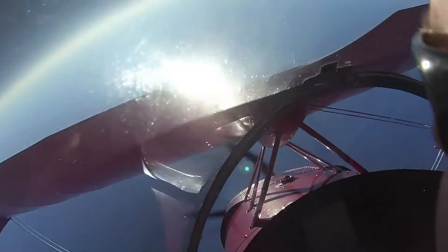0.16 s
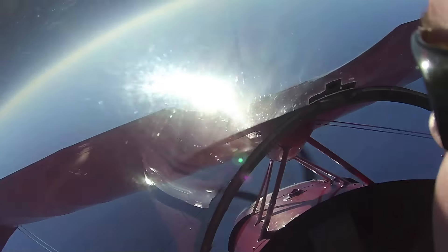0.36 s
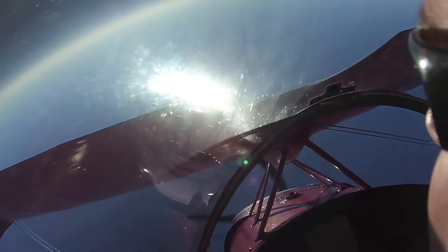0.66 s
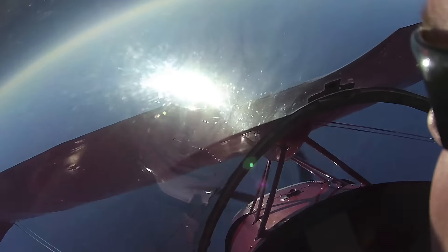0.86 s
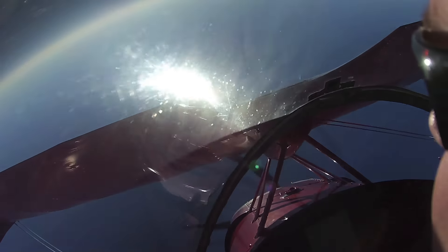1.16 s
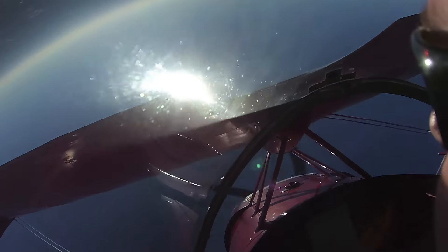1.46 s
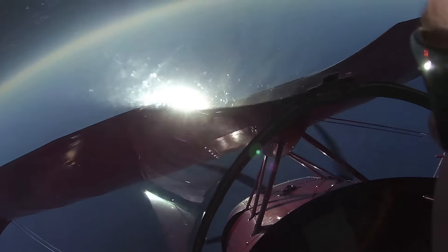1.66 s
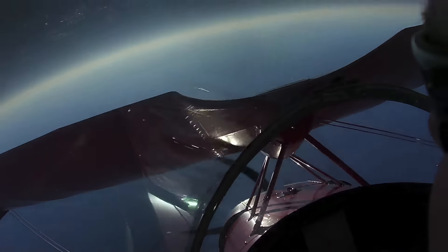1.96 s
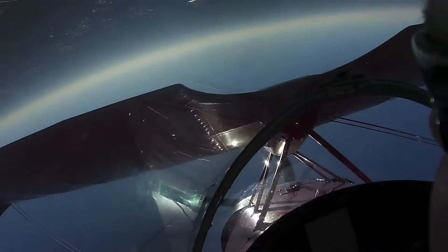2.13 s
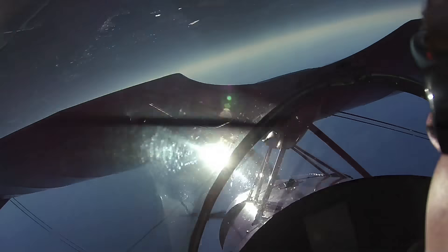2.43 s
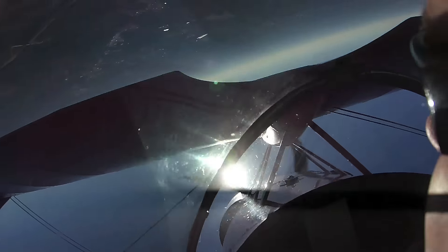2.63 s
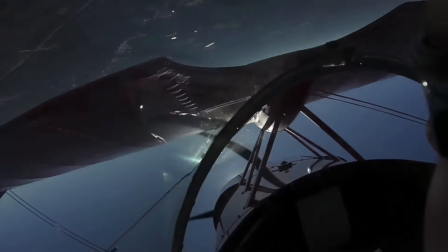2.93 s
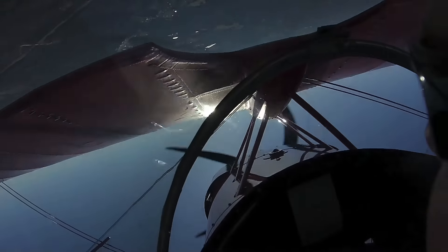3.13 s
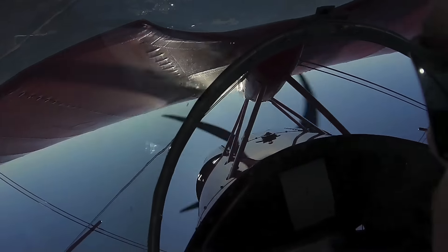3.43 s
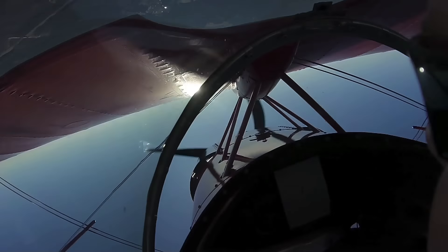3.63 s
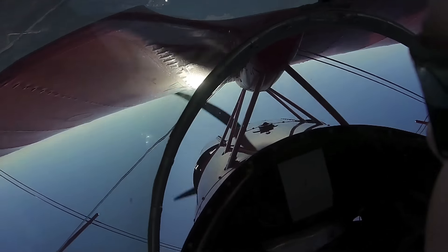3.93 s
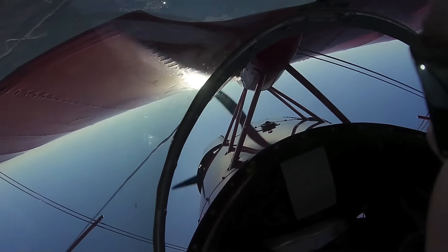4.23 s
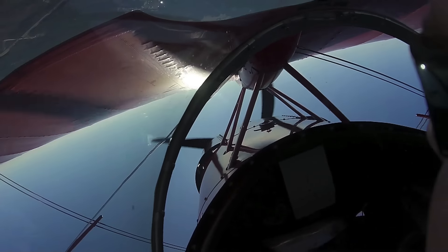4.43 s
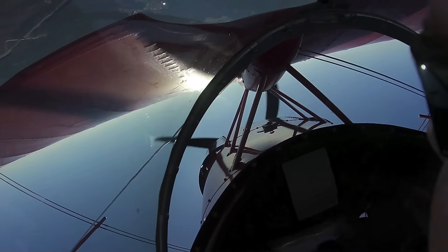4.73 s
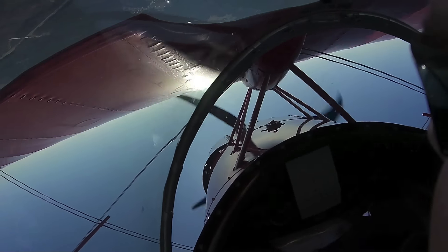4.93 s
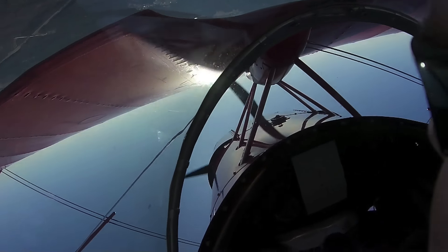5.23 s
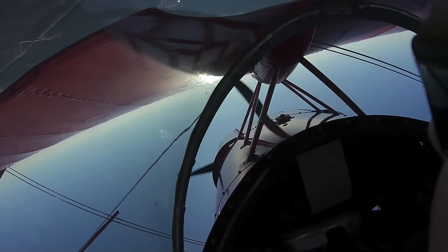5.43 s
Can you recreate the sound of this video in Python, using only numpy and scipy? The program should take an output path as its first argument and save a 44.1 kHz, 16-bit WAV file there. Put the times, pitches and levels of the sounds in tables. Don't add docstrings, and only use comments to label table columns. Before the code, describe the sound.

Inside an open biplane cockpit, a hard propeller drone and roaring wind crackle at full power, then sag to a low idle throb.

```python
import sys
import numpy as np
from scipy import signal
from scipy.fft import rfft, irfft, next_fast_len
from scipy.io import wavfile
from scipy.ndimage import uniform_filter1d, map_coordinates

SR = 44100
rng = np.random.default_rng(int(sys.argv[2]) if len(sys.argv) > 2 else 0)


def materialize(psi):
    bounded = np.clip(np.atleast_2d(psi).T, -1, 1)
    quanta = np.round(bounded * 32767).astype(np.int16)
    wavfile.write(sys.argv[1], SR, quanta)


def undo_db(level):
    steps = np.asarray(level, float) / 20
    return 10 ** steps


N = 246078
TIME_S = np.arange(N) / SR
FULL_RUSH_DB = -15.5


def unit(x):
    return x / np.sqrt(np.mean(x ** 2) + 1e-20)


def curves(rows):
    s, *columns = np.transpose(rows)
    return [np.interp(TIME_S, s, column) for column in columns]


def wobble(rate):
    knots = rng.standard_normal(int(N * rate / SR) + 4)
    return map_coordinates(knots, [np.arange(N) * rate / SR])


def dips(rows):
    return sum(db * np.exp(-((TIME_S - s) / length) ** 2) for s, length, db in rows)


def coloured(x, spectrum):
    m = next_fast_len(N + 8192)
    hz, db = np.transpose(spectrum)
    bins_hz = np.fft.rfftfreq(m, 1 / SR)
    gain_db = np.interp(np.log(bins_hz + 1), np.log(hz + 1), db)
    return irfft(rfft(x, m) * undo_db(gain_db), m)[:N]


def turbulent_noise(spectrum, patchy_db):
    z = signal.stft(rng.standard_normal(N), nperseg=512)[2]
    field = uniform_filter1d(rng.standard_normal(z.shape), size=6, axis=0)
    field = uniform_filter1d(field, size=10, axis=1)
    noise = signal.istft(z * undo_db(patchy_db * unit(field)), nperseg=512)[1][:N]
    return unit(coloured(noise, spectrum))


# t/s, f/Hz (turns per second)
SHAFT_SPEED = [(0, 37.25), (.4, 37.39), (.6, 37.4), (1, 37.19), (1.2, 37.24), (1.6, 37.17), (1.8, 37.02),
               (2, 36.74), (2.2, 36.1), (2.4, 35.15), (2.8, 33.29), (3, 32.59), (3.4, 28.85), (3.8, 24.55),
               (4.4, 18.01), (4.6, 16.52), (5.2, 18.1), (5.57, 18.3)]


def shaft_speed():
    return curves(SHAFT_SPEED)[0]


def shaft_angle():
    return 2 * np.pi * np.cumsum(shaft_speed()) / SR + .75


def order(multiple, db, drift):
    return np.sqrt(2) * undo_db(db) * np.cos(multiple * shaft_angle() - 3.7 + drift)


# f/Hz, level/dB
COCKPIT_GAIN = [(33, -17), (45, -16), (65, 7), (85, 1.5), (110, 2), (140, 10.5), (190, 3.5), (300, 8.5)]


def cockpit_db(multiple):
    hz, db = np.transpose(COCKPIT_GAIN)
    return np.interp(np.log(multiple * shaft_speed()), np.log(hz), db)


# t/s, throttle level/dB, blade load level/dB
CONTROL_MOVES = [(0, 1.5, -3.5), (.5, 0, 0.5), (1.65, 1, -2), (1.9, -3.5, 4.5), (2.5, -5, 3.5),
                 (3.15, -17, 0.5), (3.4, -10, 5.5), (3.9, -21, 7.5), (4.22, -22, 4), (4.8, -18, -3),
                 (5.58, -34, 0)]
# t/s, length/s, level/dB
TONE_LULLS = [
    (3.0, 0.06, -7),
    (4.5, 0.19, -9.5),
]
# t/s, length/s, level/dB
BLADE_OVERTONE_FADES = [(.65, 0.071, -6), (2.3, 0.073, -8.5), (3.2, 0.25, -9), (4.0, 0.053, -5)]


def propeller():
    load_db = curves(CONTROL_MOVES)[1]
    overtone_db = 0.58 * load_db + dips(TONE_LULLS)
    blade_db = -28.5 + load_db + cockpit_db(multiple=2)
    second_db = -31.5 + overtone_db + dips(BLADE_OVERTONE_FADES) + cockpit_db(multiple=4)
    fourth_db = -43 + overtone_db + cockpit_db(multiple=8)
    sound = order(2, blade_db + .3 * wobble(0.67), .06 * wobble(3.1))
    sound += order(4, second_db + .7 * wobble(5), .12 * wobble(4))
    return sound + order(8, fourth_db + .8 * wobble(5), .25 * wobble(4) - 1.5)


# t/s, length/s, level/dB
FIRING_OVERTONE_FADES = [(.8, 0.19, -12.5), (1.95, 0.076, -8), (2.5, 0.49, -3.5), (3.67, 0.088, -4),
                         (4.17, 0.11, -10), (5.1, .5, -10)]


def exhaust():
    throttle_db = curves(CONTROL_MOVES)[0]
    lull_db = dips(TONE_LULLS)
    firing_db = -19.5 + throttle_db + lull_db + cockpit_db(multiple=3)
    second_db = -26 + 0.34 * throttle_db + lull_db + dips(FIRING_OVERTONE_FADES) + cockpit_db(multiple=6)
    sound = order(3, firing_db + .3 * wobble(5), .06 * wobble(4) - .9)
    return sound + order(6, second_db + .8 * wobble(5), .25 * wobble(4))


# multiple of shaft speed, level/dB
MINOR_ORDERS = [(0.5, -36), (1, -27.5), (1.5, -25), (2.5, -15), (3.5, -14), (4.5, -11), (5, -17),
                (5.5, -19), (6.5, -23), (7, -9), (7.5, -17), (8.5, -25), (9, -18), (9.5, -26), (10, -13),
                (10.5, -32), (11, -10.5), (11.5, -28), (12, -15.5), (12.5, -25), (13, -19), (13.5, -21),
                (14, -16.5), (14.5, -19.5), (15, -13), (15.5, -28.5), (16, -20), (18, -17)]


def uneven_cylinders():
    throttle_db = curves(CONTROL_MOVES)[0]
    level_db = -19.5 + np.maximum(0.82 * throttle_db, -12.5)
    speed_change = uniform_filter1d(np.gradient(shaft_speed()) * SR, size=SR // 3)
    slope_db = 0.026 * speed_change
    sound = np.zeros(N)
    for multiple, db in MINOR_ORDERS:
        offset = 2 * np.pi * rng.random() * (multiple not in (5, 7))
        waver_db, drift = .9 * wobble(2.5), .2 * wobble(2.5)
        sound += order(multiple, level_db + db + multiple * slope_db + waver_db, drift + offset)
    return sound


def hollow(hz, width, db):
    peak = signal.iirpeak(hz, hz / width, SR)
    noise = signal.lfilter(*peak, rng.standard_normal(N))
    return undo_db(db) * unit(signal.filtfilt(*peak, noise))


# t/s, rush level/dB, turbulence level/dB
WASH_LEVELS = [(0, -18, 2), (.55, -16, -1.5), (1.65, -16.5, 4), (2.1, -18, 3), (2.6, -20.5, 5.5),
               (3.2, -24, 8.5), (4.24, -31, 11.5), (4.36, -30.8, 6.5), (4.6, -32, 9), (4.96, -31, 11),
               (5.58, -28.5, 7.5)]
# f/Hz, level/dB per Hz
RUSH_SPECTRUM = [(120, -120), (150, -67), (250, -1.5), (330, -8.5), (450, -1.5), (630, -3.5), (850, -1),
                 (1200, -4.5), (1750, -3.5), (2300, -9.5), (3000, -27.5), (4500, -70), (6000, -120)]
# f/Hz, level/dB per Hz
FIZZ_SPECTRUM = [(1000, -120), (1500, -32), (2400, 1), (3300, -2.5), (4100, -7.5), (5200, -21), (6000, -25),
                 (6800, -38), (8000, -120)]
# f/Hz, level/dB per Hz
BUFFET_SPECTRUM = [(8, -83), (12, -47), (25, -33), (45, -6.5), (80, -2.5), (150, 0.5), (250, -3),
                   (320, -18), (420, -7.5), (600, -49), (800, -120)]


def wash():
    rush_db, turbulence_db = curves(WASH_LEVELS)
    fizz_db = -12 + .22 * (rush_db - FULL_RUSH_DB)
    buffet_db, footwell_db = -9 + turbulence_db, -14.5 + 1.5 * turbulence_db
    angle = shaft_angle()
    pump = -np.cos(2 * angle - .3) - 1.3 * np.cos(4 * angle - .4) - 0.46 * np.cos(3 * angle + 0.12)
    gust = wobble(7.7)
    rush = unit(undo_db(1.05 * pump) * turbulent_noise(RUSH_SPECTRUM, patchy_db=0.5))
    fizz = unit(undo_db(1.0 * pump) * turbulent_noise(FIZZ_SPECTRUM, patchy_db=0.54))
    throb = undo_db(2.5 * wobble(30) + 1.5 * pump)
    buffet = unit(throb * turbulent_noise(BUFFET_SPECTRUM, patchy_db=0.0))
    footwell = undo_db(footwell_db) * hollow(hz=489, width=77, db=-6.5)
    slot = hollow(hz=1767, width=230, db=-12.5)
    sound = undo_db(0.85 + 0.6 * gust) * rush + footwell + slot
    sound += undo_db(fizz_db + 0.29 * gust) * fizz
    sound += undo_db(buffet_db + 0.22 * wobble(4.9)) * buffet
    return undo_db(rush_db) * sound


# f/Hz, level/dB per Hz
HISS_SPECTRUM = [(4000, -120), (5500, -13), (7000, -6.5), (7800, -2.5), (9000, -0.5), (10600, -2.5),
                 (11500, -10), (13000, -15), (14800, -23), (16000, -120)]


def amplifier_hiss():
    level_db = -53.9 + 1.04 * (curves(WASH_LEVELS)[0] - FULL_RUSH_DB)
    pump_db = .5 * wobble(14) - np.cos(2 * shaft_angle())
    return undo_db(level_db + pump_db) * turbulent_noise(HISS_SPECTRUM, patchy_db=.3)


# t/s, angle/turns
PEAK_ANGLE = [(0, -.04), (1.9, -.04), (2.0, .07), (5.58, .07)]
# from t/s, to t/s
OVERLOAD_TIMES = [
    (0, 2.1),
    (2.37, 2.68),
]
# t/s, peak level/dB
GUST_SLAMS = [(0.2354, -30), (0.3426, -30), (0.3734, -30), (0.5621, -28), (0.7761, -32), (0.7976, -30),
              (1.0365, -30), (1.0454, -30), (1.2057, -31), (1.254, -32), (1.499, -29), (1.9854, -33),
              (2.0404, -29), (2.0802, -32), (2.0914, -33), (2.1904, -29), (2.2054, -34), (2.5304, -34),
              (2.5594, -33), (2.6035, -32), (2.6618, -33)]


def flattened_peaks():
    turns = np.floor(shaft_angle() / (2 * np.pi) - curves(PEAK_ANGLE)[0])
    s = np.flatnonzero(np.diff(turns) > 0) / SR
    s = s[np.any([(s > start) & (s < end) for start, end in OVERLOAD_TIMES], axis=0)]
    size = rng.standard_normal((len(s), 2))
    again, later = rng.random((len(s), 2)).T
    control_s, throttle_db = np.transpose(CONTROL_MOVES)[:2]
    db = -48.5 + 3 * size + .8 * np.interp(s, control_s, throttle_db)[:, None]
    first = np.c_[s, db[:, 0]]
    second = np.c_[s + .003 + .004 * later, db[:, 1] + 1][again < .45]
    slams = np.add(GUST_SLAMS, (.0014, -11))
    return np.vstack([first, second, slams])


# f/Hz, level/dB per Hz
KINK_SPECTRUM = [(1500, -120), (2500, -20), (4500, 17), (7000, 11), (11000, 4), (15000, 2), (16200, -30)]


def overload():
    kinks = np.zeros(N)
    peaks = flattened_peaks()
    chance = rng.random((len(peaks), 2))
    for (s, db), (span, share) in zip(peaks, chance):
        met = round((s - .0002) * SR)
        left = met + 6 + int(25 * span)
        kinks[met] += undo_db(db + 12.5)
        kinks[left] -= undo_db(db + 17) * share
    return coloured(kinks, KINK_SPECTRUM)


def gear_whine():
    rise_s, hold_s, fall_s = .25, .62, .12
    times = 3.05 + np.cumsum([0, rise_s, hold_s, fall_s])
    level_db = -73 + np.interp(TIME_S, times, [-18, 0, 0, -18])
    return order(227, level_db + 3 * wobble(25), 1.3 * wobble(300))


def scene():
    engine = propeller() + exhaust() + uneven_cylinders() + gear_whine()
    return (engine + wash())[None]


def top_cut(x):
    return signal.sosfilt(signal.butter(12, 15800, fs=SR, output="sos"), x)


def record(dry):
    x = dry + overload() + amplifier_hiss()
    x = x / (1 + np.abs(x / 1.04) ** 6) ** (1 / 6)
    return top_cut(x)


dry = scene()
out = record(dry)
materialize(out)
```